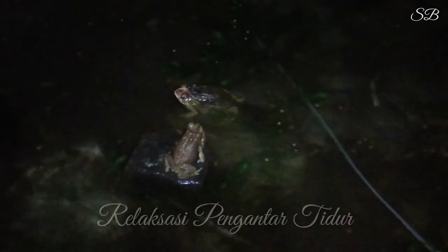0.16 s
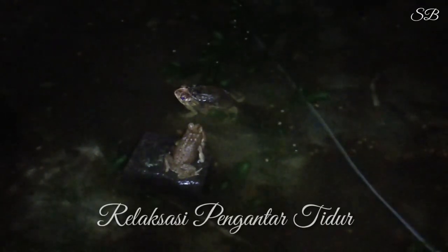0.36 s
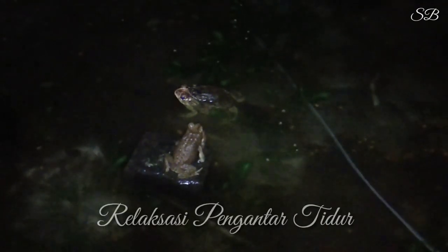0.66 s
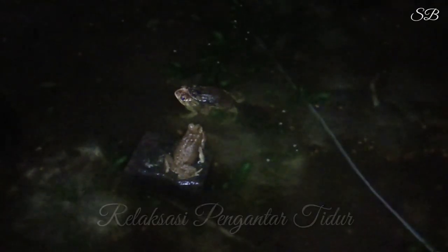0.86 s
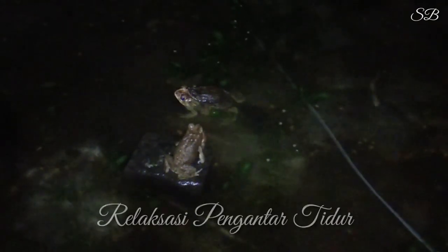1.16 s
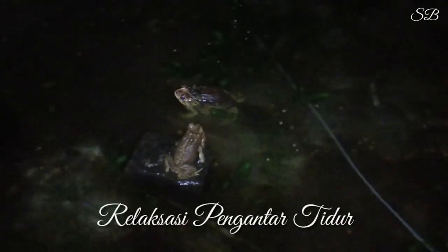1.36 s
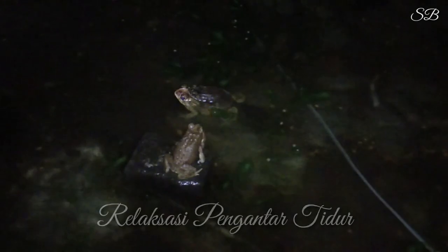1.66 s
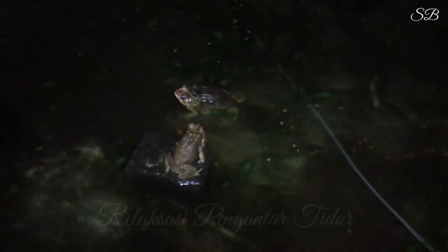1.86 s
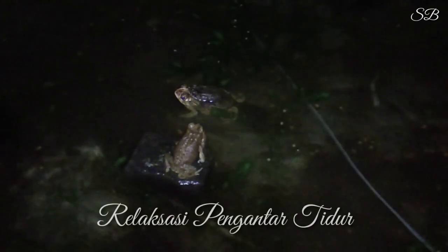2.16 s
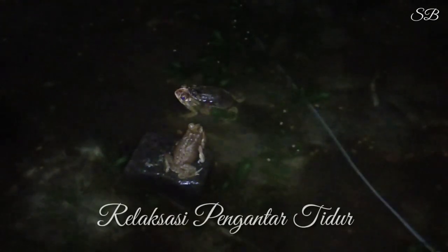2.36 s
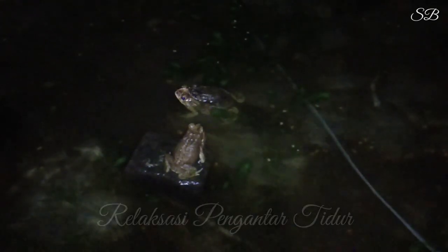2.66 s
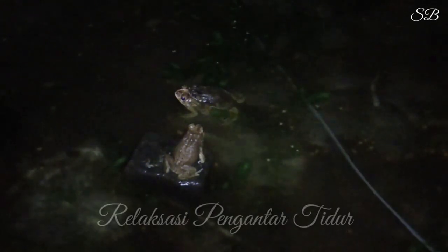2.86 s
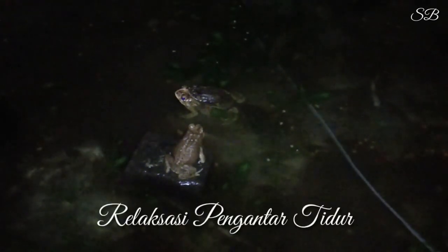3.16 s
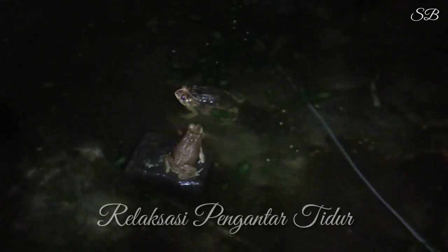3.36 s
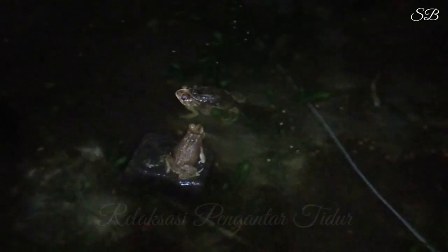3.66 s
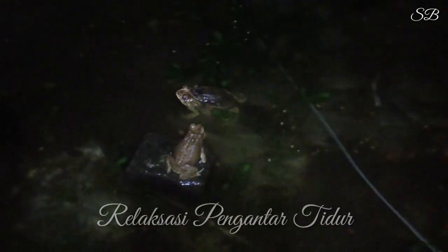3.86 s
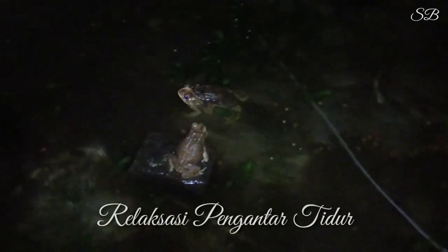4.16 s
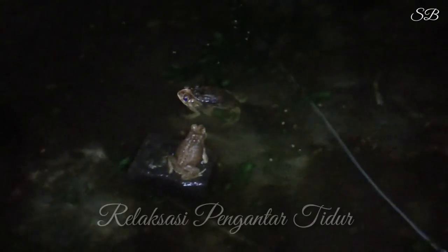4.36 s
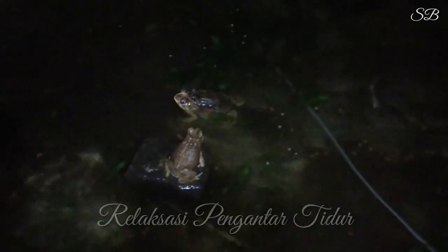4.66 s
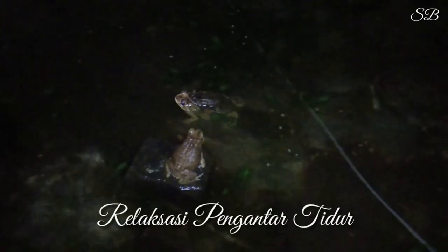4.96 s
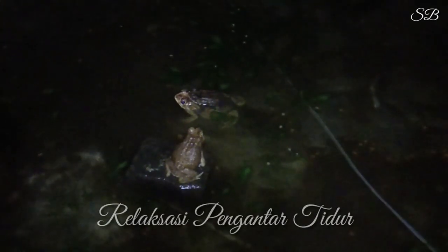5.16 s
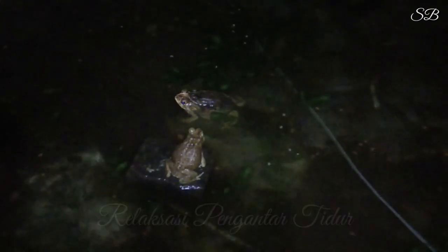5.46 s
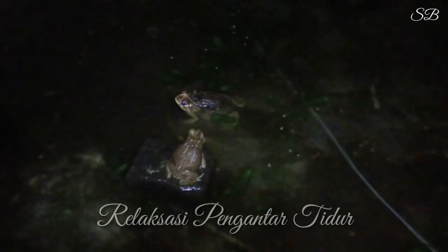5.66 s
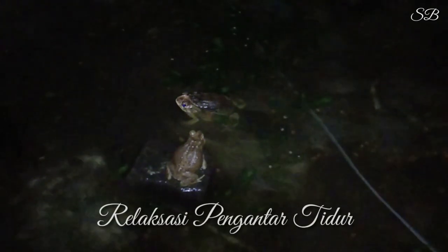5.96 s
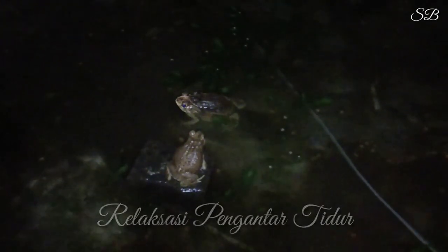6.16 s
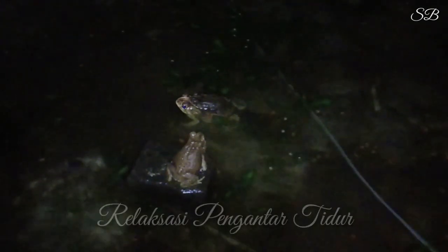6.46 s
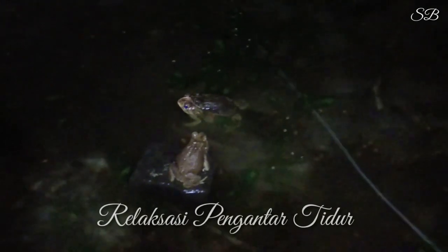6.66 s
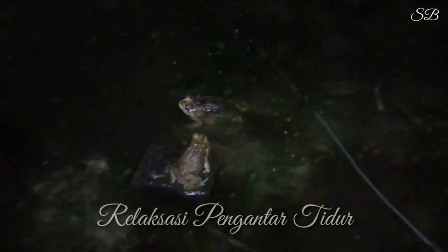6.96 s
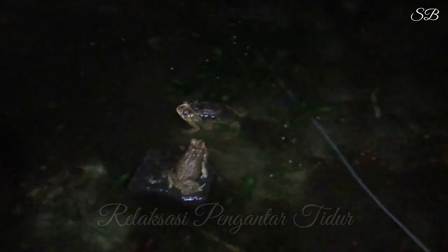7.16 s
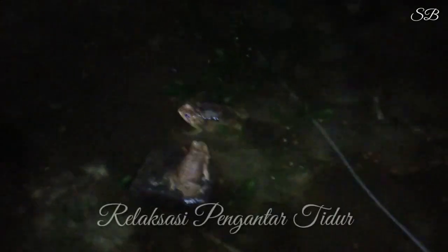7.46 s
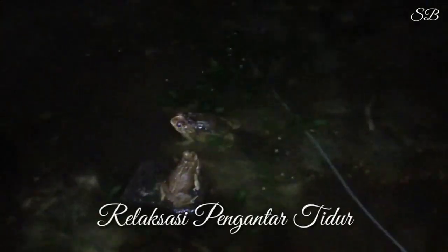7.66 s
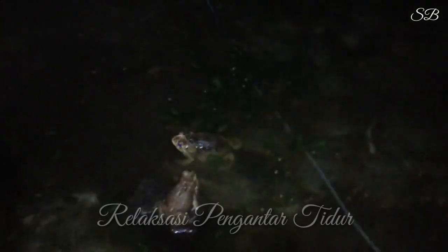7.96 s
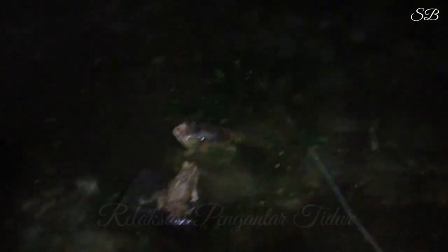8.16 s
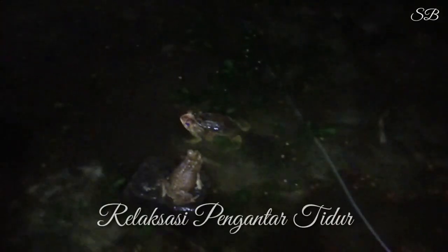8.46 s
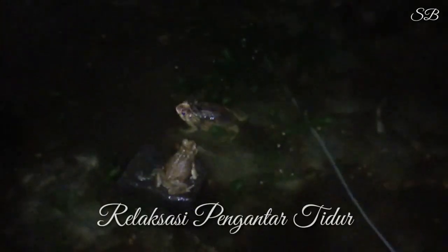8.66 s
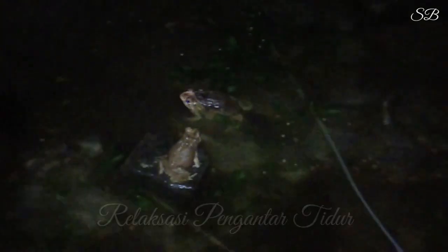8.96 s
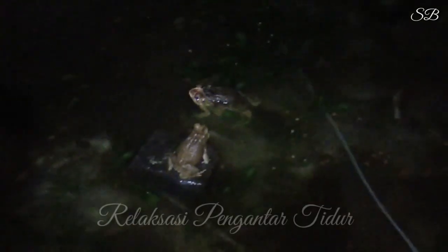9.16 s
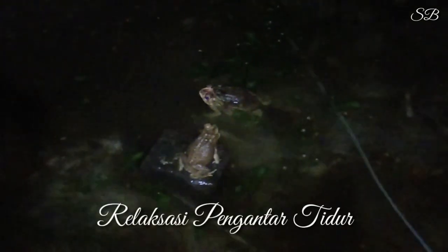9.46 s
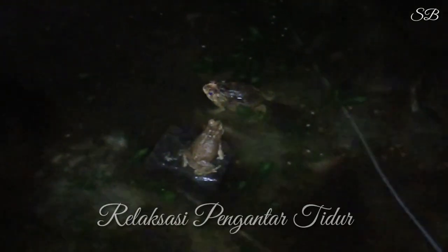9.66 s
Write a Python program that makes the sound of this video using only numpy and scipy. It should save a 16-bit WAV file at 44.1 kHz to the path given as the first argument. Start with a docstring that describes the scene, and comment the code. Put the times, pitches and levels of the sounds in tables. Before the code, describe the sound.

Beside a pond at night, a close toad trills loudly in rapid pulsed notes, then quieter distant toads answer before calling drops almost away.

```python
"""A near toad trills at night beside a pond: strings of throat pulses ring its vocal cords and sac.
Up to three quick pulses, a few slow ones and a fast run lead into a short, mostly falling whistle.
A second toad further off and a deeper one far away build their notes of quick, slow and quick pulses.
Behind them lie soft hoots, and bands of coloured noise for a blurred chorus, insects and a low rumble."""
import sys
import numpy as np
from scipy import signal
from scipy.fft import rfft, irfft, next_fast_len
from scipy.io import wavfile
from scipy.ndimage import uniform_filter1d, minimum_filter1d, map_coordinates

SR = 44100
rng = np.random.default_rng(int(sys.argv[2]) if len(sys.argv) > 2 else 0)


def wrap_up_sound(samples):
    """Save the sound to the file named by the first command line argument, as 16-bit audio."""
    columns = np.atleast_2d(samples).T
    # keep every value between -1 and 1, then stretch to whole-number steps
    tamed = np.clip(columns, -1, 1)
    steps = np.round(tamed * 32767).astype(np.int16)
    wavfile.write(sys.argv[1], SR, steps)


N = 432180  # length in samples


def amp(db):
    """Gain of a level in dB."""
    return 10 ** (np.asarray(db) / 20)


def unit(x):
    """Scale a signal to rms 1."""
    return x / np.sqrt(np.mean(x ** 2) + 1e-20)


def curves(rows):
    """Draw each column after the time as a curve with one value per sample."""
    seconds, *columns = np.transpose(rows)
    return [np.interp(np.arange(N) / SR, seconds, column) for column in columns]


def wobble(rate):
    """A smooth random curve through normally drawn knots, rate knots a second."""
    knots = rng.standard_normal(int(N * rate / SR) + 4)
    return map_coordinates(knots, [np.arange(N) * rate / SR])


def noise(points):
    """Noise of rms 1 coloured by (Hz, dB) points on a log frequency axis, silent outside them."""
    m = next_fast_len(N)
    hz, db = np.transpose(points)
    log_hz = np.log(np.fft.rfftfreq(m, 1 / SR) + 1)
    colour_db = np.interp(log_hz, np.log(hz), db, left=-120, right=-120)
    spectrum = rfft(rng.standard_normal(m)) * amp(colour_db)
    return unit(irfft(spectrum, m)[:N])


def cords(s, db, tension, hz, t60, rise, slip, afresh=False):
    """Each pulse cuts off the last and sounds the vocal cords, which start afresh or swing on with a small slip."""
    order = np.argsort(s)
    # two pulses ahead of time zero, so that every sample has a current and a previous one
    s = np.r_[-2, -1, s[order]]
    db = np.r_[0, 0, db[order]]
    tension = np.r_[1, 1, tension[order]]
    chance = slip * rng.standard_normal(len(s))  # radians
    t = np.arange(N) / SR
    now = np.searchsorted(s, t, side="right") - 1
    opening = 1 - np.exp(-((t - s[now]) / rise) ** 2)
    phase = 2 * np.pi * np.cumsum(hz * tension[now]) / SR
    lag = chance - np.interp(s, t, phase) if afresh else np.cumsum(chance)

    def fading(k):
        return amp(db[k] - 60 * (t - s[k]) / t60) * np.sin(phase + lag[k])

    return opening * fading(now) + (1 - opening) ** 2 * fading(now - 1)


def ring(s, db, tension, sac, rise, scatter_db):
    """Every pulse rings the side modes of a sac, tuned by its tension, at slightly new strengths."""
    t = np.arange(SR // 24) / SR
    chance = rng.standard_normal((len(s), len(sac)))
    wave = np.zeros((len(s), len(t)))
    for k, (hz, level, t60) in enumerate(sac):
        size = amp(level + scatter_db * chance[:, [k]] - 60 * t / t60)
        wave += size * np.sin(2 * np.pi * hz * tension[:, None] * t)
    wave *= amp(db)[:, None] * (1 - np.exp(-(t / rise) ** 2))
    at = np.round(s * SR).astype(int)[:, None] + np.arange(len(t))
    return np.bincount(at.ravel(), wave.ravel(), N + SR)[:N]


def tone(s, length, db, hz, fall, edge, overtones=(), fade_db=0, strain_db=0):
    """A tone with soft ends; its pitch falls ever faster by a share of itself, its lowest partial fades."""
    t = np.arange(round((length + 4 * edge) * SR)) / SR
    glide_hz = hz * (1 + fall * (.3 - (t / length) ** 2.4))
    phase = 2 * np.pi * np.cumsum(glide_hz) / SR + rng.uniform(0, 2 * np.pi)
    wave = amp(fade_db * (.5 - t / length)) * np.sin(phase)
    for k, level in overtones:
        partial_db = level + (k - 1) * strain_db - 3 * t / length
        wave += amp(partial_db) * np.sin(round(k) * phase)
    attack = 1 - np.exp(-(t / edge) ** 2)
    release = np.exp(-np.clip(t - length, 0, 9) / edge)
    out = np.zeros(N + SR)
    out[round(s * SR):][:len(t)] = np.sqrt(2) * amp(db) * attack * release * wave
    return out[:N]


def echoes(x, t60, db):
    """Banks and plants scatter the sound back as a dying haze that takes 10 ms to build."""
    t = np.arange(SR // 2) / SR
    build = np.clip(t / .01, 0, 1)
    tail = unit(rng.standard_normal(len(t)) * amp(-60 * t / t60) * build)
    return x + amp(db) * signal.fftconvolve(x, tail / np.sqrt(len(t)))[:N]


def pulses(notes):
    """Pulse times and levels: quick opening, near-even slow ones settling in level, fast run, a weak last one."""
    opening_s, slow_s, fast_s = .0148, .0147, .0056  # opening's time limit; target gaps, slow and fast
    last_s = .02  # last pulse, after the whistle starts
    opening_db, slow_db, last_db = [-2, -1.3, -1.5], -0.1, -7.5  # over the effort; slow once settled
    scatter_db = 1.5
    s, db = [], []
    for start, run, whistle, effort_db, gap, falter_db in notes:
        chance = rng.standard_normal((2, 24))
        has_opening = run > start + fast_s / 2
        opening = np.arange(start, start + opening_s, gap) if has_opening else np.array([])
        after = opening[-1] if len(opening) else run
        steps = max(round((run - after) / slow_s), 1)
        way = np.arange(1, steps) / steps
        slow = after + (run - after) * way ** .93
        fast_count = max(round((whistle - run) / fast_s), 1)
        fast = np.linspace(run, whistle, fast_count, endpoint=False)
        times = np.r_[opening, slow, fast, whistle + last_s]
        settling_db = slow_db - falter_db * np.linspace(1, 0, len(way)) ** 1.5
        levels = np.r_[opening_db[:len(opening)], settling_db, 0 * fast, last_db]
        # the first pulse of a note keeps its time, the others jitter
        s.append(times + .0006 * chance[0, :len(times)] * (times > start))
        db.append(effort_db + levels + scatter_db * chance[1, :len(times)])
    s, db = np.concatenate(s), np.concatenate(db)
    return s[s > 0], db[s > 0]


def near_whistles(notes):
    """Short throbbing whistles, flatter, longer and richer in overtones when the effort is feeble."""
    # Whistle overtones. Each row: multiple of the pitch, starting level in dB before strain.
    overtones = [(2, -18.5), (3, -36.5), (4, -49)]
    whistle_db, whistle_s, longer_s_per_db = -12, .016, .001  # level over the effort; length
    whistle_hz, flat_hz_per_db, flattest_hz = 1537.5, 12, 1430  # reference pitch of the glide
    whistles = np.zeros(N)
    for _, _, start, effort_db, *_ in notes[1:]:
        slack = max(-0.5 - effort_db, 0)  # dB of missing effort
        hz = max(whistle_hz - flat_hz_per_db * slack, flattest_hz)
        length = whistle_s + longer_s_per_db * slack
        fall = .058 + 0.061 * np.exp(-((slack - 8.5) / 3.2) ** 2)  # a half-hearted one drops furthest
        whistles += tone(start, length, effort_db + whistle_db, hz, fall, edge=0.0027,
                         overtones=overtones, fade_db=14.0, strain_db=0.38 * slack)
    return whistles * amp(2.5 * wobble(170))


def near_toad():
    """The sac tightens for the fast run before each whistle and slackens after it."""
    # The near toad's notes. Each row: opening in seconds, fast run in seconds, whistle in seconds,
    # effort in dB, gap of the opening pulses in seconds, falter of the first slow pulse in dB
    # (below zero it comes out stronger).
    notes = [(-.1, -.035, -.015, 3.5, .0068, 2), (0.0613, .1331, .155, -.5, .0068, -1),
             (0.2282, .2949, .323, -1, .0075, 2), (0.3864, .4436, .462, -1.5, .0068, 0),
             (0.5372, .6054, .628, 0.5, .0068, 8), (0.7007, .7696, .791, 0, .0069, 0.5),
             (0.8655, .9198, .94, -0.5, .0075, 1), (1.016, 1.0858, 1.103, 0.5, .0068, 3.5),
             (1.1799, 1.2488, 1.272, -0.5, .0071, 7.5), (1.3514, 1.4216, 1.443, -.5, .0068, 2.5),
             (1.5194, 1.6033, 1.625, 0, .007, 3), (1.7259, 1.801, 1.831, -0.5, .007, 5),
             (1.9038, 1.9573, 1.982, -1, .0066, 2), (2.0564, 2.1141, 2.135, -.5, .0069, 1),
             (2.2123, 2.2858, 2.309, 0, .0069, 3.5), (2.3813, 2.4362, 2.461, -.5, .0069, 0),
             (2.537, 2.6119, 2.648, -.5, .007, 6), (6.423, 6.423, 6.424, -17, .01, -3),
             (6.552, 6.552, 6.553, -13.5, .01, 0), (6.675, 6.6741, 6.676, -10.5, .01, -2),
             (6.7972, 6.7964, 6.806, -9.5, .01, 0), (6.915, 6.9158, 6.919, -10.5, .01, 3),
             (6.9718, 6.987, 6.993, -5, .0078, -5), (7.085, 7.0943, 7.101, -7.5, .016, 0),
             (7.1956, 7.2176, 7.241, -6, .0078, 1), (7.3302, 7.3361, 7.339, -6.5, .016, 2),
             (7.4255, 7.4682, 7.486, -3.5, .0107, 1), (7.5638, 7.5902, 7.613, -2.5, .011, -4),
             (7.6908, 7.731, 7.753, -3.5, .01, 1), (7.8317, 7.8578, 7.878, -4.5, .01, 0)]
    # Side modes of its vocal sac. Each row: pitch in Hz at tension 1, level in dB, t60 in seconds.
    sac = [(1922.5, -14, 0.049), (2011, -19, 0.033), (280, -37, 0.02), (696, -24, 0.02),
           (791, -32.5, 0.034), (1141, -39.5, 0.18), (2700, -33.5, 0.023), (3247, -22.5, 0.02),
           (3457, -15.5, 0.01), (3605, -34.5, 0.022), (4700, -48.5, 0.027), (6720, -53, 0.032)]
    s, db = pulses(notes)
    until = np.transpose(notes)[2] - s[:, None]  # seconds from each pulse to each whistle
    tighten = 0.022 * np.exp(-((until - .022) / 0.009) ** 2)
    slacken = 0.033 * np.exp(-((until + 0.031) / 0.027) ** 2)
    tension = 1 + (tighten - slacken).sum(1)
    tension -= 0.006 * np.clip(-4 - db, 0, 9)  # weaker effort, slacker sac
    voice = cords(s, db, tension, hz=1628, t60=.035, rise=.0012, slip=.25, afresh=True)
    bright_db = .7 * np.minimum(db + 1.5, 0)  # soft pulses ring the side modes less
    voice += ring(s, db + bright_db, tension, sac, rise=.001, scatter_db=1.8)
    hollow = signal.iirnotch(420, 1.6, SR)  # the body radiates little here
    return echoes(signal.lfilter(*hollow, voice + near_whistles(notes)), t60=.24, db=-13)


def chorus():
    """Many far callers blur into throbbing bands of noise."""
    # Swell of the far chorus. Each row: time in seconds, level in dB before the throb.
    swell = [(0, -51), (2.7, -40), (3.6, -40.5), (4.2, -44.5), (7.9, -41.5), (8.3, -59.5), (8.65, -53.5),
             (8.75, -50.5), (9.1, -56), (9.4, -54.5), (9.6, -75.5), (9.8, -81)]
    # Tone of the chorus. Each row: frequency in Hz, relative level in dB.
    colour = [(500, -33), (750, -13), (1100, -15), (1400, -0.5), (1650, 0), (1900, -9), (2400, -30)]
    throb_db = 1.2 * wobble(8) + 2.2 * wobble(80)
    return amp(curves(swell)[0] + throb_db) * noise(colour)


def insects():
    """Two layers of banded noise, each fluttering quickly on a slower drift."""
    # Insect loudness. Each row: time in seconds, low band in dB, high bands in dB, before the flutter.
    loudness = [(0, -48.5, -54), (2.6, -49.5, -52.5), (3.5, -49.5, -55.5), (6.4, -47.5, -53.5),
                (7.9, -51, -54.5), (8.5, -50, -55.5), (9.8, -49, -54.5)]
    # Colour of the low insects. Each row: frequency in Hz, relative level in dB.
    low_band = [(2200, -30), (2550, -18.5), (3000, -24), (3350, -5.5), (3850, -6), (4050, -22), (4500, -64)]
    # Colour of the high insects. Each row: frequency in Hz, relative level in dB.
    high_bands = [(3900, -35), (4350, -5), (4750, -0.5), (5200, -7.5), (5500, -22), (6000, -8.5),
                  (6400, -23), (7400, -30.5)]
    low_db, high_db = curves(loudness)
    low = amp(low_db + 1.2 * wobble(5.4) + 0.86 * wobble(50)) * noise(low_band)
    high = amp(high_db + 1.2 * wobble(3.5) + 1.3 * wobble(37)) * noise(high_bands)
    return low + high


def rumble():
    """Low-weighted noise that drifts slowly in level."""
    # Colour of the rumble. Each row: frequency in Hz, relative level in dB.
    colour = [(25, -26.5), (45, -16.5), (65, -1.5), (120, -0.5), (250, -6.5), (450, -12), (1000, -14),
              (2000, -26.5), (2600, -33.5)]
    return amp(-60.5 + 0.98 * wobble(0.61)) * noise(colour)


def trill(notes, slow, fast, sag_db):
    """Pulse times and levels: quick at both ends of a note, slow between and lower there by sag_db."""
    s, db = [], []
    for start, length, open_db, close_db in notes:
        chance = rng.standard_normal((32, 2))
        at = 0
        for k, (jitter, size) in enumerate(chance):
            if at > length - fast:
                break
            quick = k < 2 or at > .55 * length
            ramp_db = open_db + (close_db - open_db) * at / length
            s.append(start + at)
            db.append(ramp_db - sag_db * (not quick) + 0.57 * size)
            at += (fast if quick else slow) * (1 + 0.15 * jitter)
    return np.array(s), np.array(db)


def second_toad():
    """Pulsed notes with a closing whistle; it also calls steadily under the near toad's first trill."""
    # The second toad's later notes. Each row: start in seconds, length in seconds, closing level in dB.
    later = [(2.735, .06, -24), (2.839, .055, -20), (2.941, .082, -18.5), (3.075, .056, -19.5),
             (3.176, .071, -17.5), (3.299, .058, -16.5), (3.408, .056, -16), (3.516, .052, -13),
             (3.624, .056, -21.5), (3.731, .055, -16), (3.851, .062, -16.5), (3.959, .084, -16.5),
             (4.091, .069, -18.5), (4.218, .053, -13.5), (4.323, .072, -15.5), (4.442, .076, -18),
             (4.564, .087, -15), (4.701, .064, -19.5), (4.808, .083, -14.5), (4.95, .104, -14.5),
             (5.104, .106, -16.5), (5.261, .082, -18), (5.391, .076, -19), (5.517, .13, -21.5),
             (5.691, .052, -13), (5.817, .09, -18), (5.953, .088, -14.5), (6.099, .089, -15),
             (6.243, .097, -17), (6.396, .072, -12.5), (6.528, .09, -20), (6.7, .06, -13.5),
             (6.85, .064, -14.5), (7.0, .055, -12.5), (7.13, .069, -19), (7.28, .12, -18)]
    # Level at which its notes open. Each row: time in seconds, level in dB.
    opens = [(2.6, -25.5), (4.2, -21.5), (6.4, -20), (6.8, -20), (7.3, -23)]
    # Side modes of its vocal sac. Each row: pitch in Hz at tension 1, level in dB, t60 in seconds.
    sac = [(1674, -1, 0.012), (1826, -9, 0.016), (798, -22.5, 0.025), (1052, -24, 0.041),
           (2955, -30.5, 0.031)]
    hidden = [(s, .07, -22) for s in np.arange(.03, 2.6, .121)]
    open_s, open_db = np.transpose(opens)
    notes = [(s, length, np.interp(s, open_s, open_db), close_db)
             for s, length, close_db in list(later) + hidden]
    s, db = trill(notes, slow=0.011, fast=.0065, sag_db=-0.5)  # its slow pulses are a touch stronger
    tension = 1 + 0.006016 * rng.standard_normal(len(s))
    voice = cords(s, db, tension, hz=1452, t60=.038, rise=.002, slip=.8)
    voice += ring(s, db + 0.32, tension, sac, rise=0.00096, scatter_db=2.5)
    for start, length, _, close_db in notes:  # the closing whistle
        voice += tone(start + length - .027, .022, close_db - 14.0, hz=1451.7, fall=0.012, edge=0.006,
                      overtones=[(2, -30.5)], fade_db=1.5)
    return echoes(voice, t60=.15, db=-7)


def hoots():
    """Soft single tones that sink slightly in pitch."""
    # The hoots. Each row: start in seconds, length in seconds, level in dB, reference pitch in Hz.
    calls = [(0.547, 0.35, -62, 291), (8.051, 0.38, -68, 293), (8.2, .25, -62.5, 164.4),
             (8.458, 0.13, -54, 470), (8.89, 0.11, -63.5, 492)]
    return sum(tone(*call, fall=.01, edge=.03) for call in calls)


def deep_toad():
    """Notes loud at the opening and fainter after; the pitch creeps up from note to note after 8 s."""
    # The deep far toad's notes. Each row: start in seconds, opening level in dB.
    calls = [(5.216, -40.5), (5.3492, -36), (5.4829, -35), (5.6126, -38.5), (5.7344, -34), (5.8691, -36),
             (5.9883, -40.5), (6.123, -35.5), (6.2477, -34.5), (6.3689, -36), (6.5061, -33), (6.6338, -33),
             (6.76, -35), (6.8937, -32), (7.0429, -31.5), (7.1794, -30), (7.3277, -32.5), (7.4694, -34),
             (7.9942, -32.5), (8.1434, -32), (8.2826, -32), (8.4198, -32), (8.5579, -31.5), (8.6941, -32),
             (8.8243, -31.5), (8.9685, -31)]
    # Side modes of its vocal sac. Each row: pitch in Hz at tension 1, level in dB, t60 in seconds.
    sac = [(1700, -5.5, 0.017), (740, -7, 0.015)]
    notes = [(s, .068, db, db - 6) for s, db in calls]
    s, db = trill(notes, slow=0.011, fast=0.0079, sag_db=5.5)
    creep = 0.02 * np.clip(s - 8.5, -.5, .5)
    tension = 1 + creep + 0.012 * rng.standard_normal(len(s))
    voice = cords(s, db, tension, hz=1080, t60=.04, rise=.0013, slip=.7)
    voice += ring(s, db, tension, sac, rise=.001, scatter_db=2.5)
    return echoes(voice, t60=0.21, db=-3)


def scene():
    """All callers and the background at one microphone."""
    background = chorus() + insects() + rumble() + hoots()
    return (near_toad() + second_toad() + deep_toad() + background)[None]


def record(dry):
    """A quick limiter holds the loudest pulses; nothing is kept above the band limit."""
    ceiling, top_hz = .8, 7520
    needed = np.minimum(1, ceiling / (np.abs(dry) + 1e-9))
    held = dry * uniform_filter1d(minimum_filter1d(needed, size=121), size=61)
    m = next_fast_len(N + SR // 4)
    kept = np.fft.rfftfreq(m, 1 / SR) < top_hz
    return irfft(rfft(held, m) * kept, m)[..., :N]


dry = scene()
out = record(dry)
wrap_up_sound(out)
```